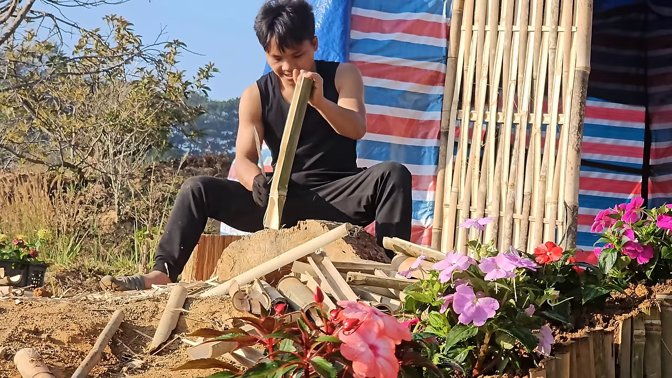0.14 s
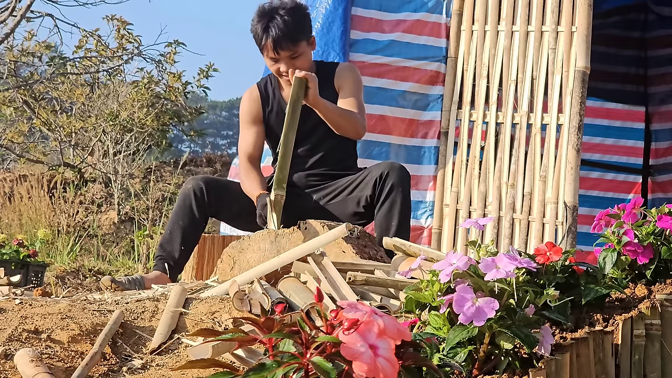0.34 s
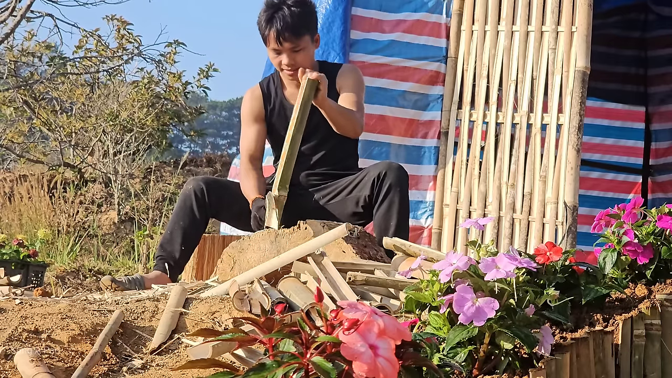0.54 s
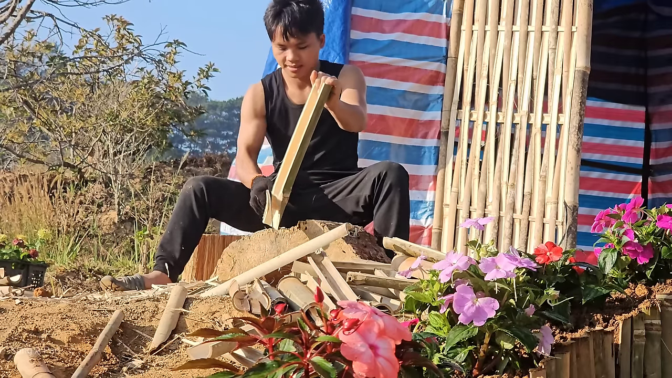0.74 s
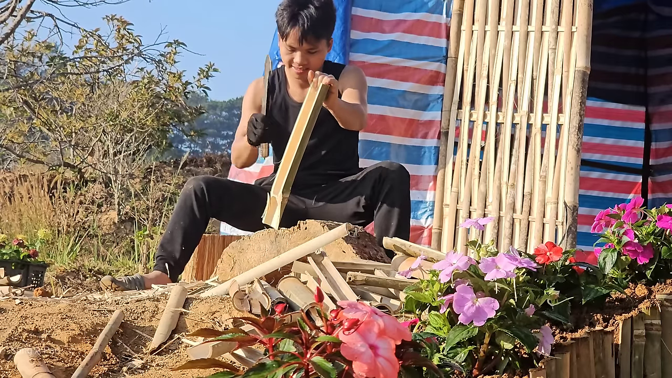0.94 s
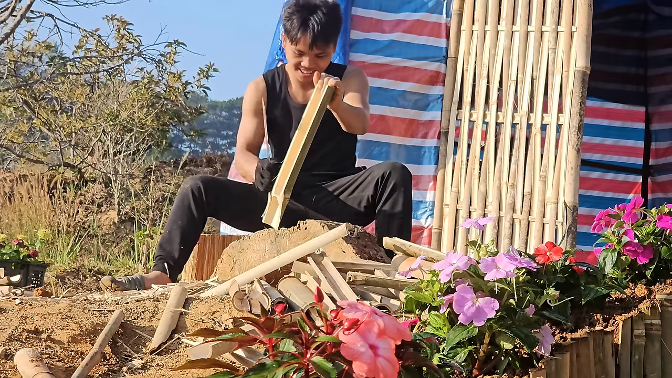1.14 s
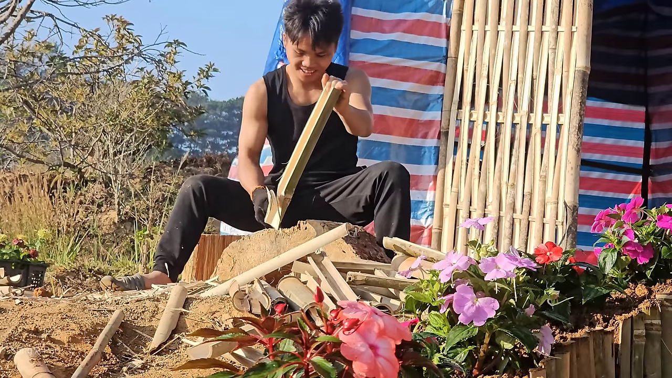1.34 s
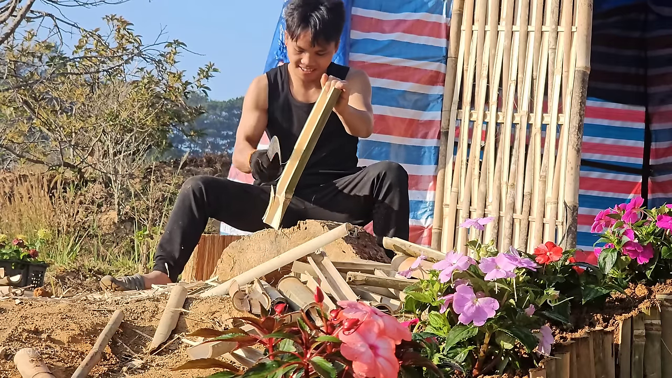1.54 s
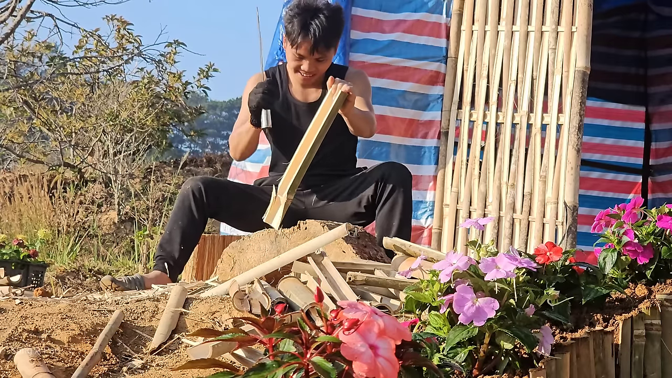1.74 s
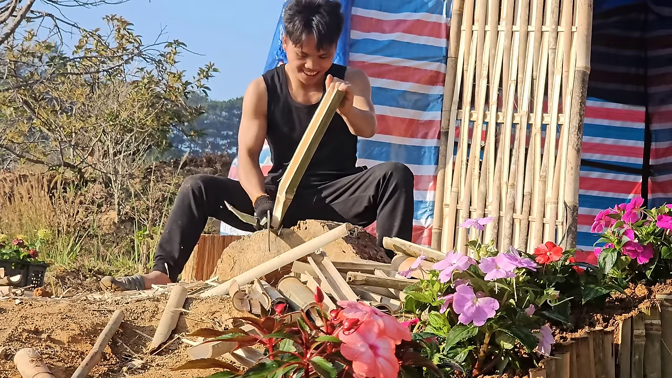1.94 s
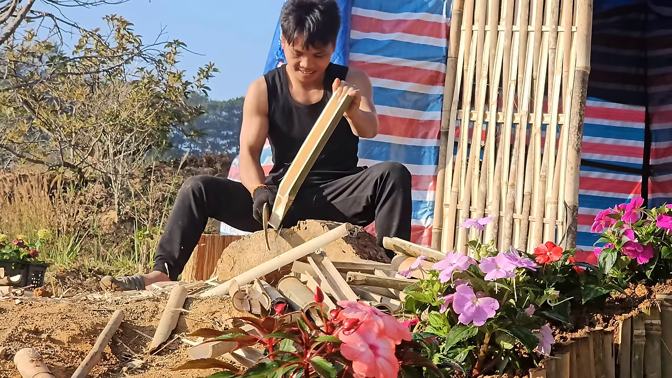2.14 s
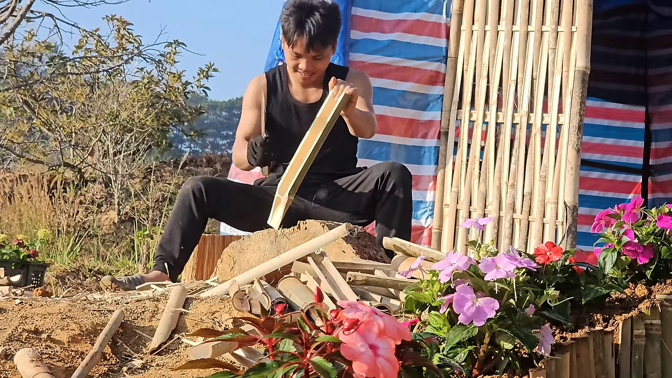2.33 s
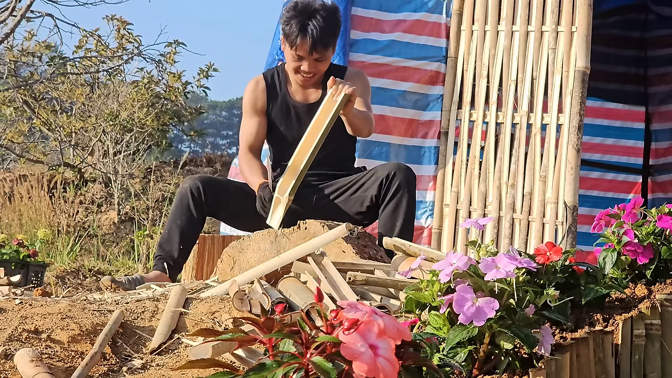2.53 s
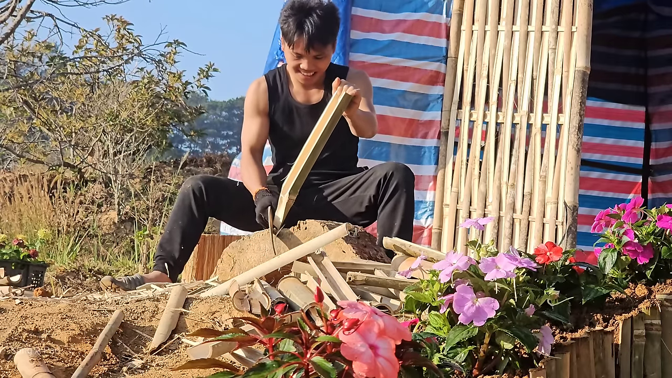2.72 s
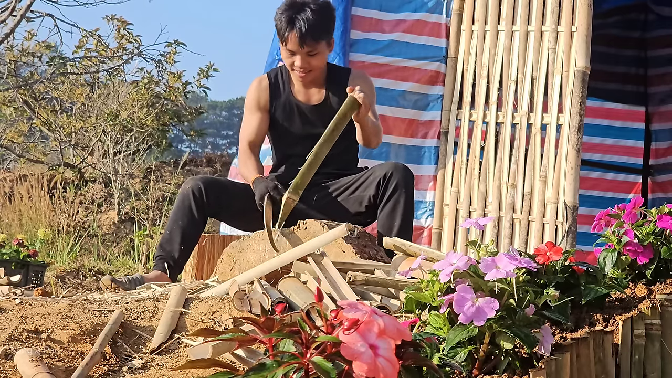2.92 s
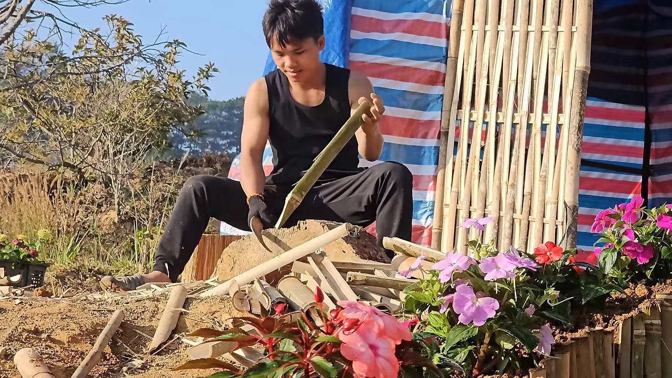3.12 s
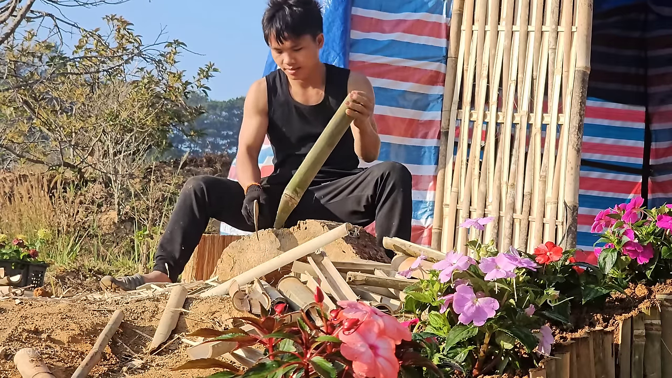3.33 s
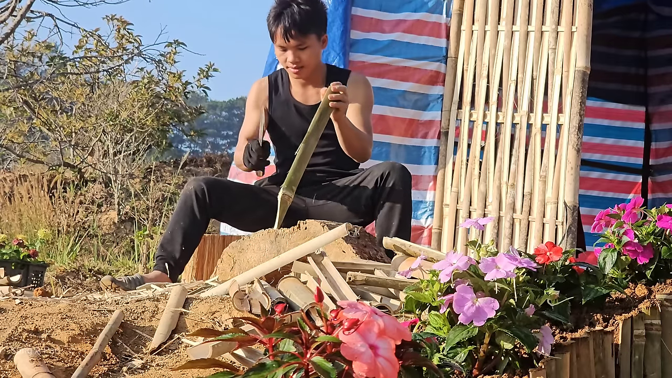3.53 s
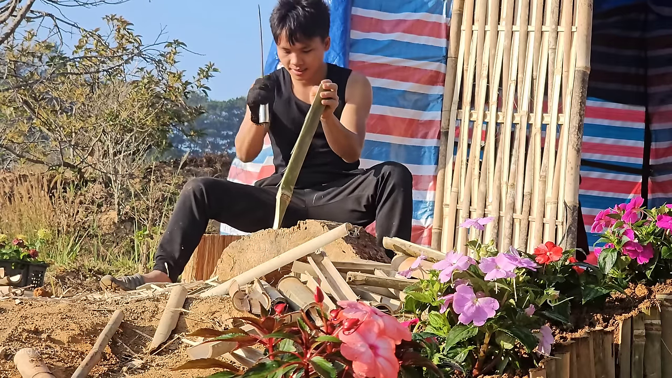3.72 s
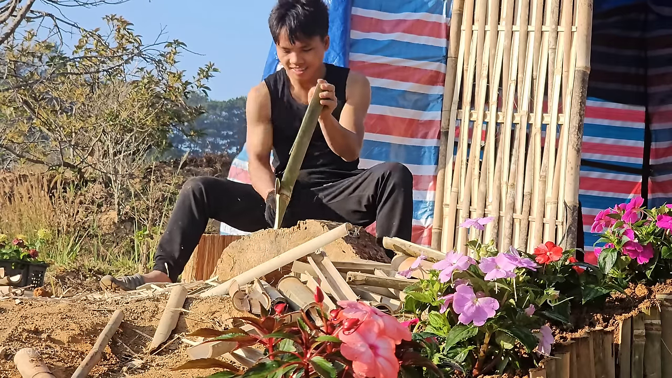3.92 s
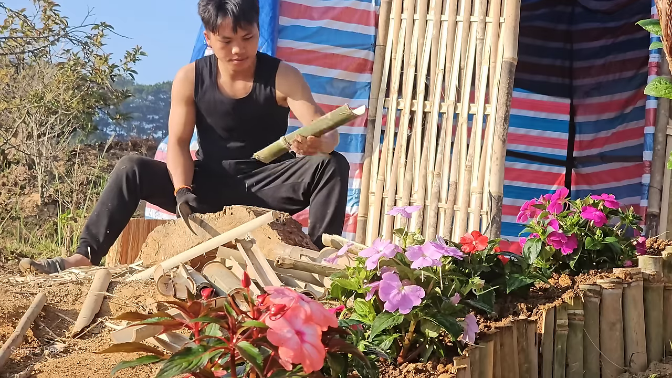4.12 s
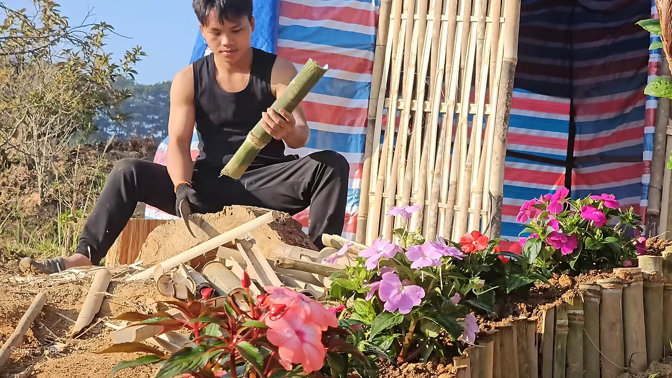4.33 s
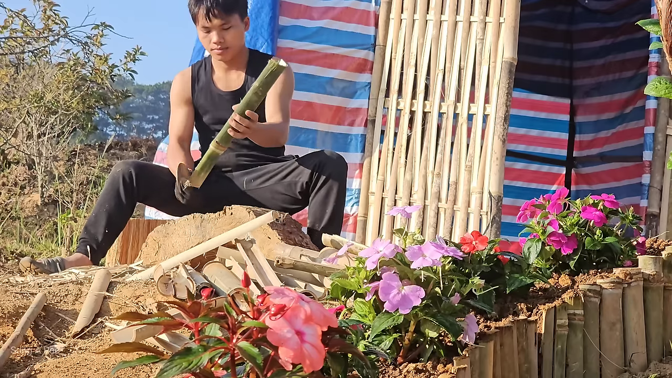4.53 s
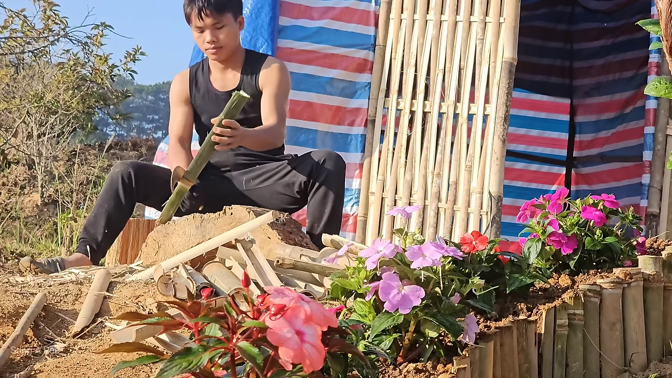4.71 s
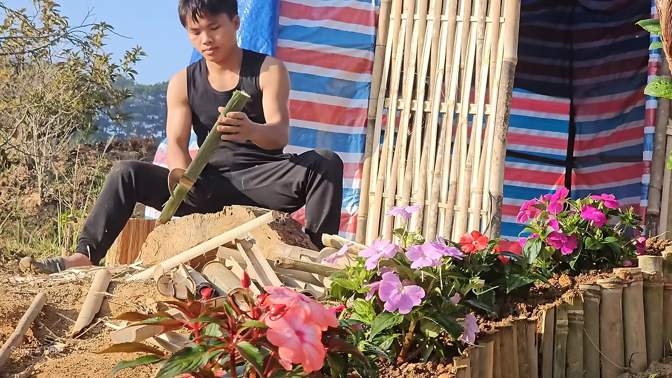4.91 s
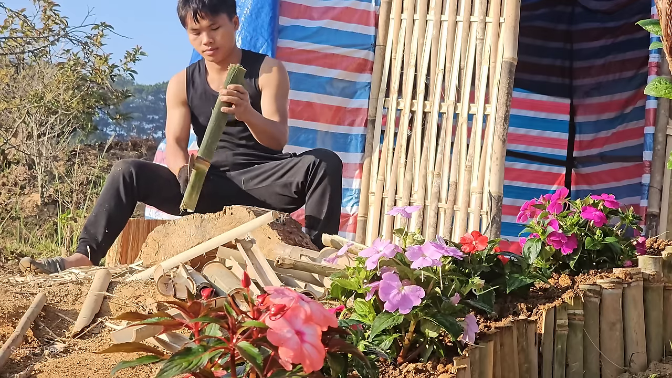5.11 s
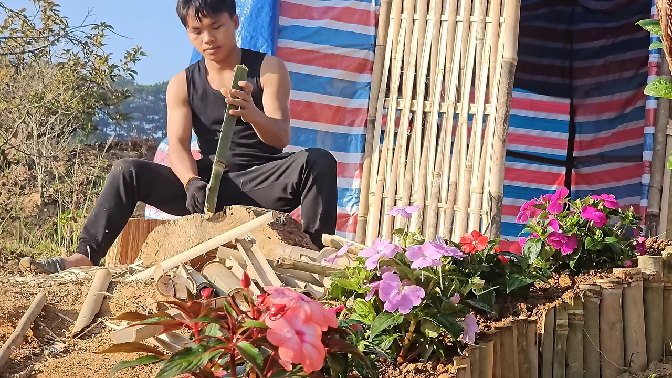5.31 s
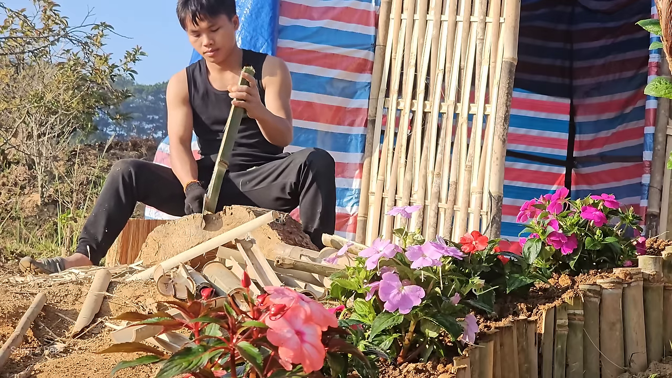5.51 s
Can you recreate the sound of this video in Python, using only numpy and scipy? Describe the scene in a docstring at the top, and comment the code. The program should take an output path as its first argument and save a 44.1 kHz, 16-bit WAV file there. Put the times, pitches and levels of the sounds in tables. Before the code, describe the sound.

A quiet outdoor place with soft low rumble and slight hiss, heard from a fairly close stereo microphone with hardly any echo. At 0.24 s a modest machete chop knocks bamboo against a wooden stump. Small birds give short, thin arched whistles, mostly in the first second. Sharper, hollow cracks with torn fibre and a low thud land at 1.24 and 1.94 s, with a distant falling twitter between them. A barely audible bump follows at 2.2 s, then a rapid double chop at 2.6 s. More faint whistles and twitters come from 3.1 s. The loudest chop hits at 3.95 s, crisp, with a short metallic ring, and the sound drops almost away until about 4.2 s. Then a glove slides softly with three little rubs, birds twitter, and faint scrapes surround light wooden taps at 4.73-4.77 s and a clearer clustered set at 5.31-5.43 s.

```python
"""Trimming bamboo with a machete

A machete trims a length of bamboo standing on a wooden stump, outdoors.
Chops and bumps are damped modes with bursts of filtered noise grains for torn fibre and scuffs.
The piece is turned in a rubbing glove and set down again, both made of shaped noise and taps.
Small birds whistle far off as gliding sine tones, over a low rumble of coloured noise."""
import sys
import numpy as np
from scipy import signal
from scipy.fft import rfft, irfft
from scipy.io import wavfile

SR = 44100
rng = np.random.default_rng(int(sys.argv[2]) if len(sys.argv) > 2 else 0)


def log_audio(samples):
    """Write samples as a 16-bit WAV file to the path given in sys.argv[1]."""
    # one column per channel
    frames = np.atleast_2d(samples).T
    # limit to full scale, then quantise
    limited = np.clip(frames, -1, 1)
    pcm = np.round(limited * 32767).astype(np.int16)
    wavfile.write(sys.argv[1], SR, pcm)


N = 245195
TIME = np.arange(N) / SR  # s, the whole scene
AGE = TIME[:SR // 3]  # s since the onset of one short sound

# Open air. Each row: frequency in Hz, level in dB per Hz.
AIR_SPECTRUM = [(15, -53.5), (25, -19.5), (59, -4), (119, -2), (260, -11.5), (359, -24.5), (509, -23),
                (895, -33.5), (1050, -27), (1170, -35), (1410, -30.5), (1800, -37.5), (2700, -33),
                (5730, -42.5), (15500, -51)]
AIR_DB, AIR_PAN_DB = -51, 1
# Left-right likeness of the air. Each row: frequency in Hz, likeness from 0 to 1.
AIR_LIKENESS = [(60, 0.97), (250, 0.92), (700, 0.18), (2000, 0), (6000, 0)]
# Left-right likeness of the splintering. Each row: frequency in Hz, likeness from 0 to 1.
SPLINTER_LIKENESS = [(300, 0.98), (900, .88), (1500, .7), (2200, 0.97), (10000, 0.22)]

# Glove rubbing on the culm. Each row: frequency in Hz, level in dB per Hz.
RUB_SPECTRUM = [(300, -16), (1000, -9), (1600, -2), (2300, 0.5), (3300, -8), (4200, 0), (6000, -10),
                (15500, -14)]
# The steady grip, and the slide through the glove that is strongest at first.
GRIP_DB, SLIDE_DB, SLIDE_FADE_DB_PER_S = -76, -67.5, 1.5
SLIDE_START_S, SLIDE_ATTACK_S = 4.15, 0.078
# Short feeding strokes through the glove. Each row: frequency in Hz, level in dB per Hz.
STROKE_SPECTRUM = [(1000, -20), (1500, 2), (2200, -1), (2800, -16), (8000, -35)]
STROKE_START_S, STROKE_EVERY_S, STROKE_S, STROKE_DB = 4.30, 0.125, 0.089, -68.5

# Arched whistles. Each row: start in seconds, length in seconds, held pitch in Hz, level in dB,
# left-minus-right pan in dB.
ARCHED_WHISTLES = [(-.03, 0.22, 2894, -55, 1), (0.321, .21, 2672, -51.5, 3), (0.567, 0.108, 2554, -56, 1),
                   (0.633, 0.16, 3695, -51, 7.5), (.72, .06, 2395, -57.5, 5), (2.138, 0.2, 3585, -55, 14),
                   (3.072, 0.081, 3400, -58, 5), (3.764, 0.2, 3595, -54, 14.5)]
# An arch opens and closes below its held pitch by these shares of its height over rest.
REST_HZ, SCOOP, SAG = 2110, 0.37, 0.26
# Whistles that slide down onto their pitch. Each row: start in seconds, held pitch in Hz, level in dB.
SLURRED_WHISTLES = [(.11, 3660, -62), (.435, 3670, -63), (.755, 3700, -64), (2.47, 4030, -67)]
SLUR_S, SLUR_OPENING_RATIO, SLUR_PAN_DB = 0.15, 1.18, 8
# Level peeps. Each row: start in seconds, length in seconds, pitch in Hz, level in dB.
LEVEL_PEEPS = [(0.256, 0.14, 3230, -60), (.738, .044, 1520, -57.5), (4.235, .14, 7520, -64),
               (5.132, .14, 3440, -61.5), (5.45, 0.049, 2870, -55)]

# Blade blows. Each row: start in seconds, culm level in dB, culm pitch ratio, stump knock in dB,
# tearing length in seconds, tearing tilt in dB per octave (well above 1 kHz), left-minus-right pan in dB.
BLADE_BLOWS = [(0.2392, -27, 1.02, -26.5, 0.013, -1.5, 0), (1.2427, -13, 1.003, -25, 0.0099, 1, 0),
               (1.9429, -11.5, 1.01, -23, 0.018, -0.8, -0.2), (2.6125, -21, 0.95, -25, 0.021, 0.3, 1.2),
               (2.6341, -20.5, .98, -18, 0.011, -8.5, 0.7), (3.9426, -23.5, 1.2, -37.5, .005, 0, -2),
               (3.946, -8.7, 1.03, -19.3, 0.007, 1.6, -1)]
# Hollow bamboo under the edge. Each row: mode frequency in Hz, level in dB, t60 in seconds.
CULM_MODES = [(1093, -7, 0.016), (1392, -5, 0.039), (1549, -0.5, .026), (1708, -13.5, 0.0057),
              (2081, -11, 0.031), (2500, -25, 0.058), (2775, -21.5, 0.045), (3070, -39.5, 0.056),
              (3310, -26.5, 0.057), (4030, -25.5, 0.049), (5320, -23.5, 0.03)]
# Wooden stump. Each row: mode frequency in Hz, level in dB, t60 in seconds.
STUMP_MODES = [(205.6, -1.5, 0.041), (260, -0.5, 0.044), (405, -11, 0.045), (630, 0.5, 0.019),
               (699, 0.5, 0.022), (825, -6.5, 0.065), (1076, -11.5, 0.024)]
# Soil under the stump. Each row: mode frequency in Hz, level in dB, t60 in seconds.
SOIL_MODES = [(76.7, -0.5, 0.12), (112, -6.5, .06)]
# Free blade. Each row: mode frequency in Hz, level in dB, t60 in seconds.
BLADE_MODES = [(4838, 0, .055), (6230, -15, .05), (8760, -10, .06)]
# Torn bamboo fibre. Each row: frequency in Hz, level in dB per Hz.
FIBRE_SPECTRUM = [(200, -2), (600, -3.5), (1500, -5.5), (2100, -0.5), (2500, -13), (3100, 2), (3900, -12),
                  (5300, -6.5), (6600, -15.5), (9000, -15), (12000, -17), (15500, -18)]
SNAPS_PER_S = 7000  # mean rate of grains in tearing and scuffing
TEAR_DB, TEAR_FOLLOWS = -27, 0.26  # tearing under a 0 dB blow; share of the blow's dB that it follows
# Soil against the mean of culm and stump; a long tear uses up the swing.
THUD_DB, THUD_LOSS_DB_PER_S, THUD_DELAY_S = 0.5, 560, 0.0028
FREE_RING_S, FREE_RING_DB = 3.9475, -25.5  # the last chop cuts through and leaves the blade ringing

# Runs of short falling notes. Each row: start in seconds, end in seconds, notes per second,
# first pitch in Hz, level in dB.
TWITTER_RUNS = [(1.026, 1.72, 11.5, 2918, -63.5), (3.201, 3.72, 11.4, 2800, -64.5),
                (3.22, 3.58, 13, 3290, -65.5), (4.26, 4.87, 12.8, 2830, -61.5)]
# A note starts above and ends below its pitch by the share NOTE_FALL; the whole run sinks.
NOTE_S, NOTE_FALL, RUN_SAG_HZ_PER_S = 0.055, 0.06, 220

# Bumps of the cut end on the stump. Each row: start in seconds, knock in dB, pitch ratio,
# scuff in dB, scuff tilt in dB per octave (well above 1 kHz).
END_BUMPS = [(2.216, -55, 0.67, -58, -5), (4.7285, -42, 0.65, -45.5, -0.5), (4.774, -48.5, 0.73, -45.5, 2),
             (5.3136, -35.5, 0.99, -53.5, -2.5), (5.399, -41.5, 0.86, -46.5, -2.5)]
# Cut end of the culm. Each row: mode frequency in Hz, level in dB, t60 in seconds.
CUT_END_MODES = [(550, -25, 0.032), (798, -2, 0.056), (1038, -4, 0.036), (1413, -9.5, 0.08),
                 (2020, -15, 0.081), (2410, -20, 0.026), (3260, -24, 0.039)]
# Cut fibres dragging on wood. Each row: frequency in Hz, level in dB per Hz.
SCUFF_SPECTRUM = [(200, 25), (600, -6), (1300, 12), (2000, 3.5), (3000, -0.5), (4600, 4.5), (6800, -5),
                  (11000, -1.5), (15500, -7)]
SCUFF_S = 0.0073
REBOUND_S, REBOUND_DB = 0.016, -1.5  # two rocks after the last bump: spacing, level against the bump
# Light scrapes of the turning piece. Each row: start in seconds, level in dB.
LIGHT_SCRAPES = [(4.9, -60.5), (4.996, -54.5), (5.05, -56), (5.104, -52.5)]
SCRAPE_S, SCRAPE_TILT_DB = 0.0052, 1.5

# Brief dip in level after the last chop. Each row: time in seconds, level in dB.
LEVEL_DIP = [(3.98, 0), (4.027, -8), (4.042, -40), (4.148, -44), (4.172, -18), (4.245, 0)]
TOP_CUTOFF_HZ = 15750
WORK_LEAD_S, BIRD_LEAD_S = 0.000039, 0.0001  # how far the left channel runs ahead


def from_db(db):
    """Decibels to gain."""
    return 10 ** (np.asarray(db) / 20)


def rms_one(x):
    """Scale to unit power."""
    return x / np.sqrt(np.mean(x ** 2) + 1e-20)


def curve(rows):
    """A table of (s, value) at every sample."""
    return np.interp(TIME, *np.transpose(rows))


def at_hz(points, hz):
    """A table of (Hz, value) read on a log-frequency axis."""
    f, value = np.transpose(points)
    return np.interp(np.log(hz + 1), np.log(f), value)


def add(track, s, sound):
    """Mix a sound into a track from time s on, cropped to the track."""
    start = int(round(s * SR))
    first, last = max(start, 0), min(start + sound.shape[-1], N)
    track[..., first:last] += sound[..., first - start:last - start]


def panned(db):
    """Channel gains for a left-minus-right level in dB."""
    return from_db([[db / 2], [-db / 2]])


def placed(x, lead_s):
    """A source off axis arrives in the left channel first."""
    left = np.interp(TIME + lead_s, TIME, x[0])
    return np.array([left, x[1]])


def coloured(x, spectrum, tilt_db=0):
    """Give a noise a tilted spectrum that falls away below its lowest point; rms 1."""
    size = x.shape[-1]
    hz = np.fft.rfftfreq(size, 1 / SR)
    gain = from_db(at_hz(spectrum, hz) + tilt_db * np.log2(1 + hz / 1000))
    low_fall = np.minimum(hz / spectrum[0][0], 1) ** 2
    return rms_one(irfft(rfft(x) * gain * low_fall, size))


def stereo_noise(likeness, size=N):
    """White noise whose two channels are alike by a share that depends on frequency."""
    mid, side = rfft(rng.standard_normal((2, size)))
    alike = np.clip(at_hz(likeness, np.fft.rfftfreq(size, 1 / SR)), 0, 1)
    return irfft(np.sqrt(1 + alike) * mid + np.sqrt(1 - alike) * side * [[1], [-1]], size)


def scatter(x, likeness, t60, delay_s, dull_hz):
    """Many weak, dull reflections from ground, fence and bushes, as decaying filtered noise."""
    paths = stereo_noise(likeness, size=len(AGE))
    echoes = signal.sosfilt(signal.butter(1, dull_hz, fs=SR, output="sos"), paths)
    echoes = echoes * (AGE > delay_s) * from_db(-60 * AGE / t60)
    response = rms_one(echoes) / np.sqrt(len(AGE))  # unit energy per channel on average
    return signal.fftconvolve(x, response, axes=1)[:, :N]


def open_air():
    """A low rumble and faint hiss: steady noise, alike in both channels only in the bass."""
    return from_db(AIR_DB) * coloured(stereo_noise(AIR_LIKENESS), AIR_SPECTRUM) * panned(AIR_PAN_DB)


def glove():
    """Friction noise: a faint grip throughout, then a louder slide and three strokes as the piece turns."""
    since_s = np.maximum(TIME - SLIDE_START_S, 0)
    attack = np.minimum(since_s / SLIDE_ATTACK_S, 1)
    slide = attack * from_db(SLIDE_DB - SLIDE_FADE_DB_PER_S * since_s)
    level = np.hypot(from_db(GRIP_DB), slide)  # grip and slide add in power
    out = level * coloured(stereo_noise(AIR_LIKENESS), RUB_SPECTRUM)
    swell = from_db(STROKE_DB) * np.sin(np.pi * np.minimum(AGE / STROKE_S, 1))
    for k in range(3):
        rub = coloured(stereo_noise(SPLINTER_LIKENESS, size=len(AGE)), STROKE_SPECTRUM)
        add(out, STROKE_START_S + k * STROKE_EVERY_S, swell * rub)
    return out


def whistle(length_s, opening_hz, held_hz, closing_hz, slide=0.11, waver=0.0052, flutter_db=2.5):
    """A near-pure note slides onto its held pitch, then bends to its closing pitch, wavering slightly."""
    u = np.linspace(0, 1, int(length_s * SR))  # progress through the note
    knots = np.linspace(0, 1, 16)
    wobble, flutter = (np.interp(u, knots, row) for row in rng.standard_normal(size=(2, 16)))
    opening = (opening_hz - held_hz) * np.exp(-u / slide)
    closing = (closing_hz - held_hz) * u ** 2
    hz = (held_hz + opening + closing) * (1 + waver * wobble)
    swell = np.tanh(2 * np.sin(np.pi * u)) * from_db(flutter_db * flutter) / 2
    return swell * np.sin(2 * np.pi * np.cumsum(hz) / SR)


def birds():
    """Arches, downward slurs and level peeps from the scrub; the higher an arch, the wider it sweeps."""
    out = np.zeros((2, N))
    for s, length_s, hz, db, pan_db in ARCHED_WHISTLES:
        height_hz = hz - REST_HZ
        note = whistle(length_s, hz - SCOOP * height_hz, hz, hz - SAG * height_hz)
        add(out, s, from_db(db) * panned(pan_db) * note)
    for s, hz, db in SLURRED_WHISTLES:
        note = whistle(SLUR_S, hz * SLUR_OPENING_RATIO, hz, hz, slide=0.22)
        add(out, s, from_db(db) * panned(SLUR_PAN_DB) * note)
    for s, length_s, hz, db in LEVEL_PEEPS:
        add(out, s, from_db(db) * whistle(length_s, hz, hz, hz, waver=0.008))
    return out


def struck(modes, contact_s, pitch=1):
    """Damped modes of alternating sign, building up over the contact time."""
    rings = np.zeros(len(AGE))
    for k, (hz, db, t60) in enumerate(modes):
        decay = from_db(db - 60 * AGE / t60)
        rings += (-1) ** k * decay * np.sin(2 * np.pi * hz * pitch * AGE)
    return rings * (1 - np.exp(-AGE / contact_s))


def crackle(spectrum, length_s, rise_s, fade_t60, grain_db, clump_db, tilt_db=0):
    """Fibres snap in quick clumps while the edge travels, then the splinters settle."""
    sizes = from_db(grain_db * np.minimum(rng.exponential(1, len(AGE)), 4))
    snaps = sizes * (rng.random(len(AGE)) < SNAPS_PER_S / SR)
    knots = AGE[::SR // 600]  # about 600 clump levels per second
    clumps = from_db(clump_db * np.interp(AGE, knots, rng.uniform(-0.85, 1, len(knots))))
    noise = stereo_noise(SPLINTER_LIKENESS, size=len(AGE))
    grains = coloured(noise * snaps * clumps, spectrum, tilt_db)
    rise = 1 - np.exp(-(AGE / rise_s) ** 2)
    fade = from_db(-60 * np.maximum(AGE - length_s, 0) / fade_t60)
    return grains * rise * fade


def chops():
    """The edge knocks and splits the culm; the rest of the blow passes down into stump and soil."""
    out = np.zeros((2, N))
    for s, culm_db, pitch, stump_db, tear_s, tilt_db, pan_db in BLADE_BLOWS:
        culm = from_db(culm_db) * struck(CULM_MODES, contact_s=0.0012, pitch=pitch)
        stump = from_db(stump_db) * struck(STUMP_MODES, contact_s=0.00049)
        tear = crackle(FIBRE_SPECTRUM, tear_s, rise_s=0.0034, fade_t60=0.093,
                       grain_db=2, clump_db=2.3, tilt_db=tilt_db)
        tear = from_db(TEAR_DB + TEAR_FOLLOWS * culm_db) * tear
        add(out, s, (culm + stump + tear) * panned(pan_db))
        thud_db = (culm_db + stump_db) / 2 + THUD_DB - THUD_LOSS_DB_PER_S * tear_s
        add(out, s + THUD_DELAY_S, from_db(thud_db) * struck(SOIL_MODES, contact_s=0.0017))
    add(out, FREE_RING_S, from_db(FREE_RING_DB) * struck(BLADE_MODES, contact_s=0.001))
    return out


def twitters():
    """Runs of quick falling notes from farther away, blurred by the trees between."""
    out = np.zeros((2, N))
    for start, end, per_s, first_hz, db in TWITTER_RUNS:
        for beat in np.arange(start, end, 1 / per_s):
            s, pitch = rng.normal([beat, 1], [0.006, 0.012])  # loose timing (s) and pitch ratio
            hz = pitch * (first_hz - RUN_SAG_HZ_PER_S * (beat - start))
            note = whistle(NOTE_S, hz * (1 + NOTE_FALL), hz, hz * (1 - NOTE_FALL), slide=0.26, waver=0.008)
            add(out, s, from_db(db) * note)
    blur = scatter(out, AIR_LIKENESS, t60=0.35, delay_s=0.011, dull_hz=7000)
    return from_db(-3) * out + from_db(-10.5) * blur


def scuff(length_s, tilt_db):
    """Cut fibres drag briefly over wood, as a short burst of grains."""
    return crackle(SCUFF_SPECTRUM, length_s, rise_s=0.00052, fade_t60=0.095,
                   grain_db=-3, clump_db=0.5, tilt_db=tilt_db)


def taps():
    """The cut end bumps and scrapes on the stump, ringing its own modes, then rocks to rest."""
    out = np.zeros((2, N))
    for s, knock_db, pitch, scuff_db, tilt_db in END_BUMPS:
        knock = from_db(knock_db) * struck(CUT_END_MODES, contact_s=0.00035, pitch=pitch)
        add(out, s, knock + from_db(scuff_db) * scuff(SCUFF_S, tilt_db))
    last_s, last_db = END_BUMPS[-1][:2]
    for k in (1, 2):
        rock = struck(CUT_END_MODES, contact_s=0.00047, pitch=rng.normal(1, 0.048))
        add(out, last_s + k * REBOUND_S, from_db(last_db + REBOUND_DB) * rock)
    for s, db in LIGHT_SCRAPES:
        add(out, s, from_db(db) * scuff(SCRAPE_S, SCRAPE_TILT_DB))
    return out


def scene():
    """Work on the stump and birdsong, each with its reflections, in the open air."""
    song = placed(birds(), BIRD_LEAD_S)
    song_echo = scatter(song, AIR_LIKENESS, t60=0.25, delay_s=0.021, dull_hz=5000)
    song = from_db(-1) * song + from_db(-17) * song_echo
    work = placed(chops() + taps(), WORK_LEAD_S)
    work_echo = scatter(work, SPLINTER_LIKENESS, t60=0.093, delay_s=0.011, dull_hz=4000)
    work = work + from_db(-20.5) * work_echo
    return open_air() + glove() + song + work + twitters()


def record(dry, dip_split_hz=250, treble_depth=1.26):
    """The brief dip takes the treble down further than the bass; the top is cut."""
    bass = signal.sosfilt(signal.butter(2, dip_split_hz, fs=SR, output="sos"), dry)
    bass_dip = from_db(curve(LEVEL_DIP))
    treble_dip = bass_dip ** treble_depth  # multiplies the dip's dB
    dipped = bass * (bass_dip - treble_dip) + dry * treble_dip
    top_cut = signal.ellip(10, 0.2, 70, TOP_CUTOFF_HZ, fs=SR, output="sos")
    return signal.sosfilt(top_cut, dipped)


dry = scene()
out = record(dry)
log_audio(out)
```